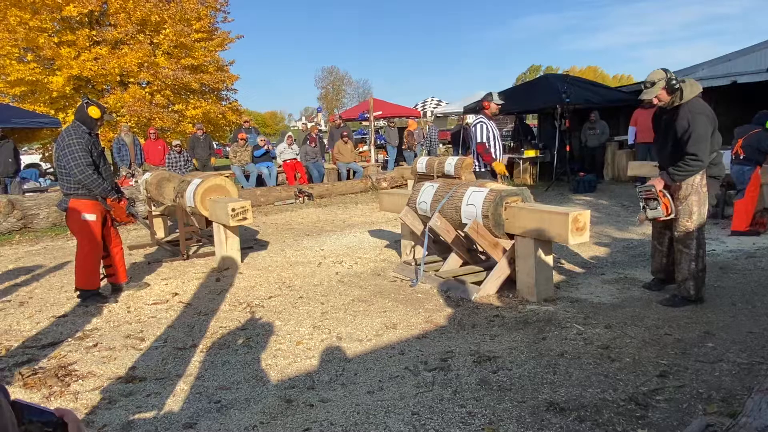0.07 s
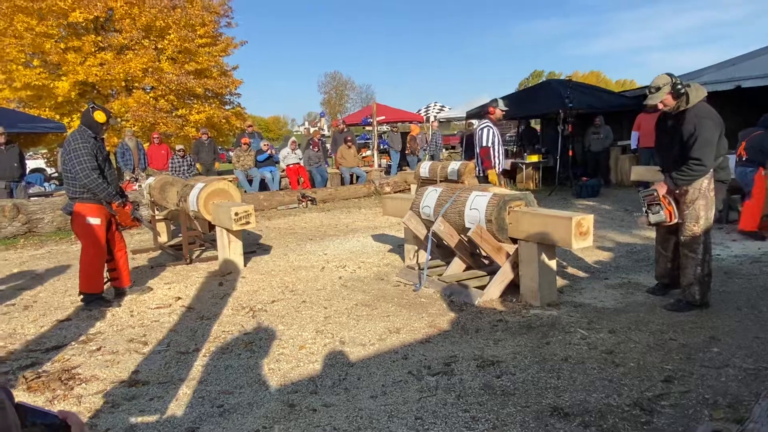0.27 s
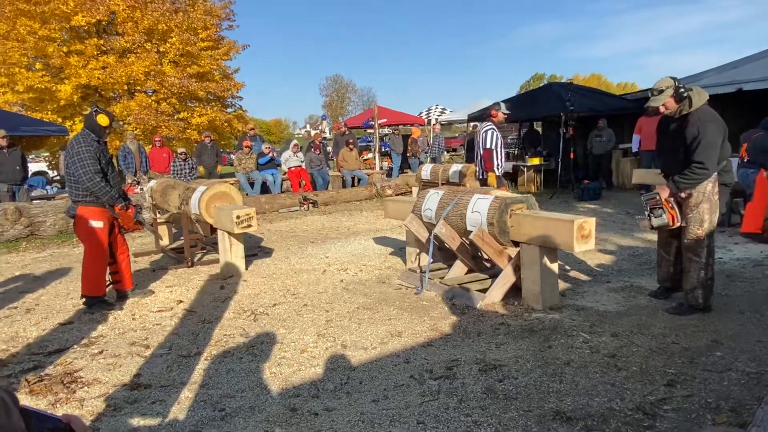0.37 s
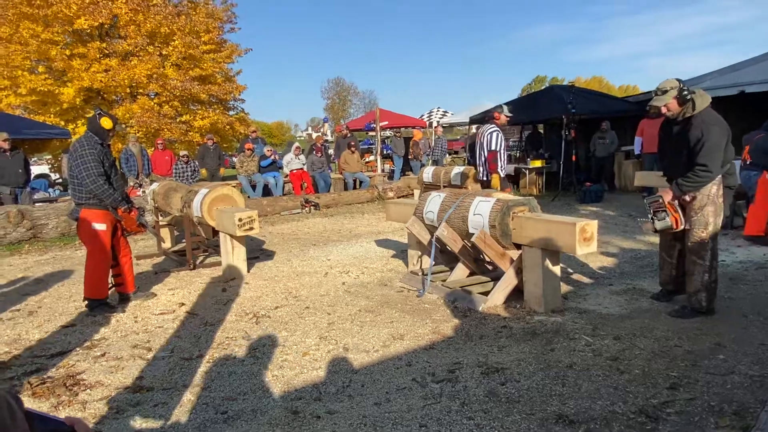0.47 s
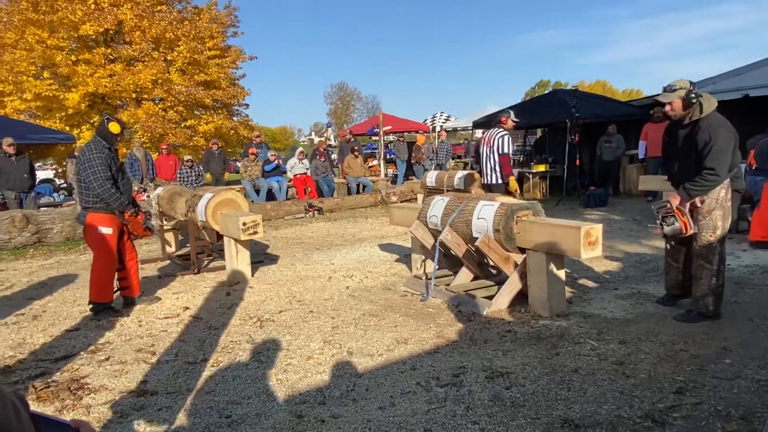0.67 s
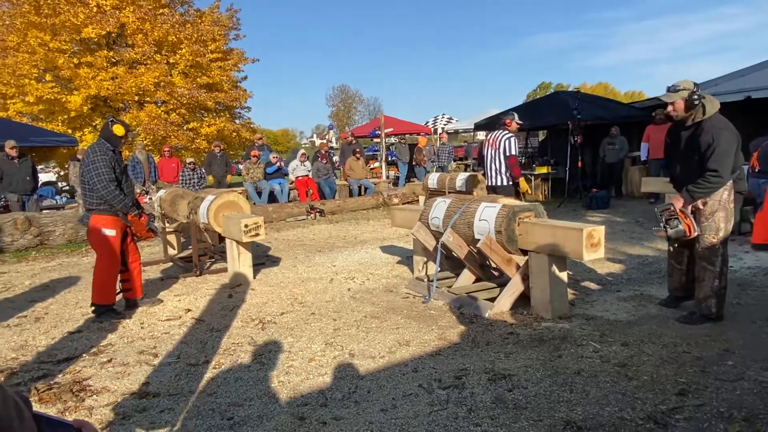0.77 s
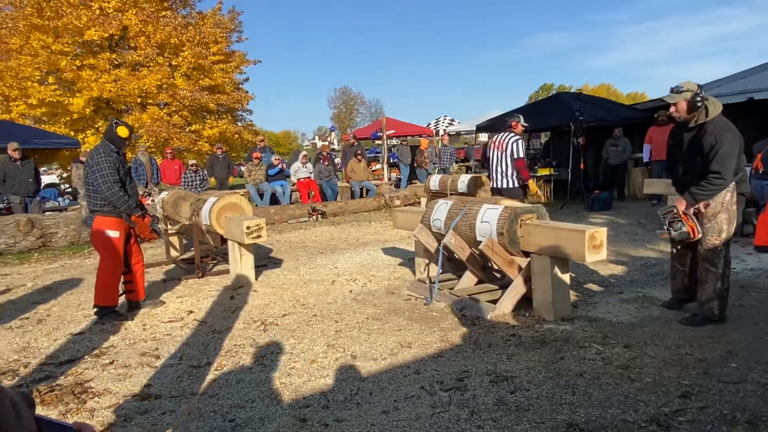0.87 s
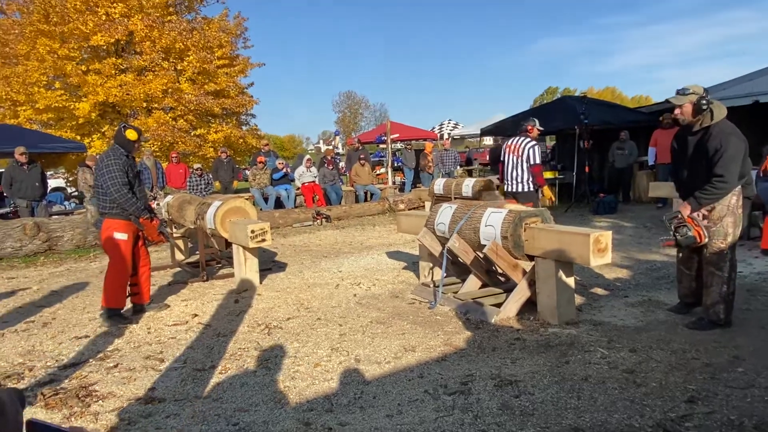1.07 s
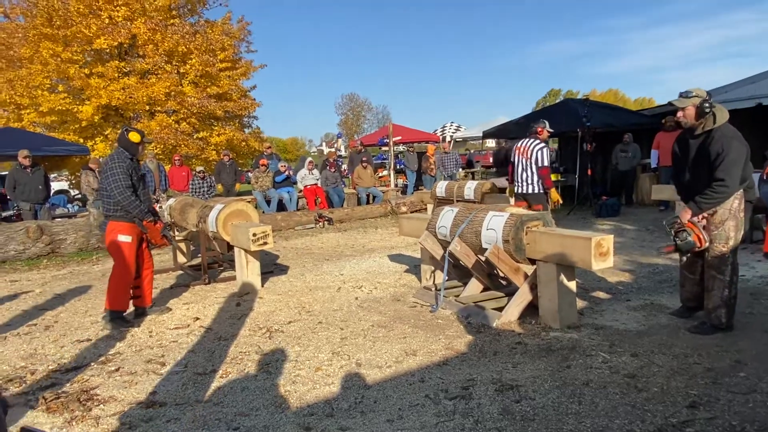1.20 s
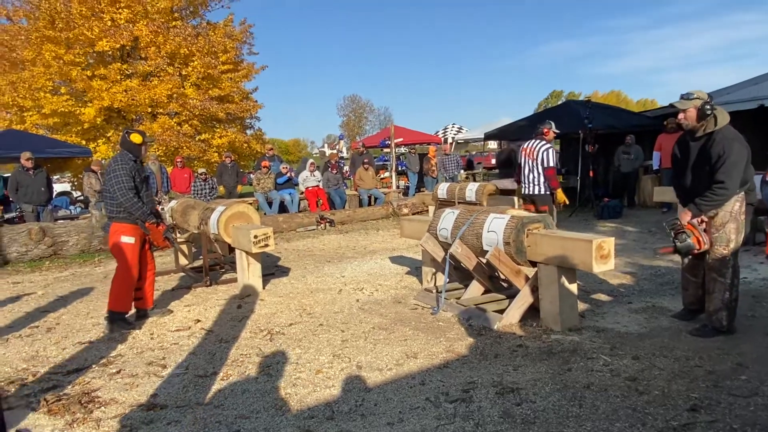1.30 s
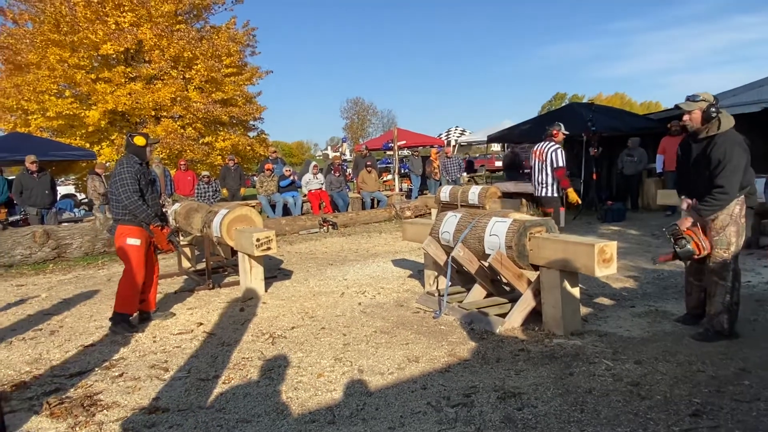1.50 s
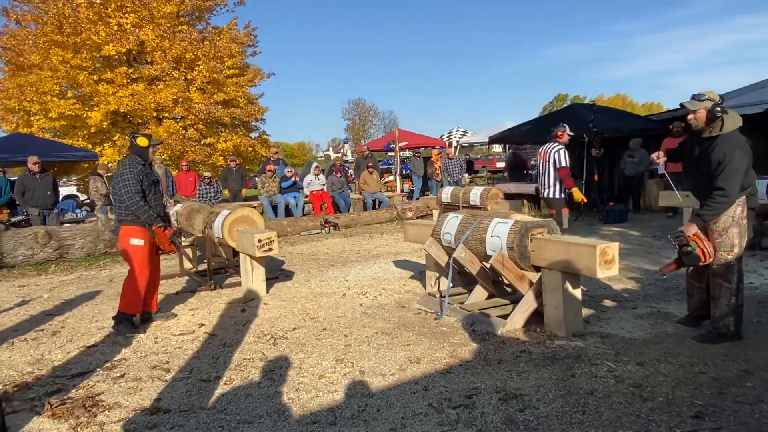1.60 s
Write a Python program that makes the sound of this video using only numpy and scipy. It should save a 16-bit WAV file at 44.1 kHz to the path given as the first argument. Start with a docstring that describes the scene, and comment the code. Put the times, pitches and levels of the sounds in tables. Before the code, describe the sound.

One sharp rev of a two-stroke chainsaw, rising to a scream and falling away.

```python
"""In an open arena, a two-stroke chainsaw is revved flat out, then let go so that it coasts down.
Each turn of the crank pushes an exhaust pulse through the muffler and makes it ring; near top speed
the engine misses every other firing. Single pops sound as it picks up and as it catches again.
Behind it are echoes and a distant din, and air buffets the two openings of a small microphone."""
import sys
import numpy as np
from scipy import signal
from scipy.fft import rfft, irfft, next_fast_len
from scipy.io import wavfile

SR = 44100
rng = np.random.default_rng(int(sys.argv[2]) if len(sys.argv) > 2 else 0)


def file_out(sig):
    """Save sig as 16-bit WAV at sys.argv[1]."""
    # one column per channel
    cols = np.atleast_2d(sig).T
    # limit, then scale
    lim = np.clip(cols, -1, 1)
    pcm = np.round(lim * 32767).astype(np.int16)
    wavfile.write(sys.argv[1], SR, pcm)


N = 72765

# Tone of the distant din and of the wind (frequency [Hz], gain [dB])
DIN_TONE = [(50, -51), (200, -10), (330, -25), (430, -1), (800, -7), (1150, 2), (1400, 3.5), (2600, -2),
            (5000, -58), (7000, -12), (12000, -28.5)]
WIND_TONE = [(20, -22), (45, -16), (72, -3.5), (110, -7), (170, -19), (300, -13), (800, -23)]
# How the wind swells and fades (time [s], level [dB])
WIND_LEVEL = [(0.07, -85), (.3, -70), (.39, -49.5), (.6, -39), (.78, -42.5), (.88, -51), (.94, -52),
              (.98, -50.5), (1.04, -51.5), (1.27, -59), (1.45, -69), (1.65, -52.5)]
# Single firings at low speed (time [s], strength [dB])
POPS = [(.0925, -17), (.129, -11), (1.629, -12), (1.6335, -28), (1.646, -18)]
# How fast the crank spins (time [s], speed [turns per second])
CRANK_SPEED = [(0.07, 62), (.12, 81), (.182, 116), (.218, 139), (.24, 153), (.28, 173), (.34, 190),
               (.4, 200.7), (.5, 213.6), (.6, 222), (.7, 228.3), (.805, 231.6), (.84, 225.5), (.9, 211.3),
               (1, 187.3), (1.1, 169.6), (1.2, 154.9), (1.3, 138.8), (1.5, 114.4), (1.65, 100.5)]
# How evenly the fuel burns (time [s], chance of a miss after a firing [0-1],
# chance of a miss after a miss [0-1], spread in strength [dB], roughness [0-1])
FIRING = [(0.1, 0, 0, 3, .4), (.19, 0, 0, 1.2, .15), (.29, 0, 0, .8, .12), (.32, .3, 0, 1.2, .22),
          (.39, 1, 0, 1, .2), (.56, 1, 0, .8, .15), (.58, 0, 0, .8, .18), (.62, 0, 0, .8, .18),
          (.635, 1, 0, .5, .1), (.71, 1, 0, .5, .1), (.74, 1, .4, .8, .18), (.8, 1, .5, .8, .18),
          (.83, 0, 0, .8, .15), (1.2, 0, 0, 1, .2), (1.65, 0, 0, 1.5, .25)]
# Tone of each part of the saw's sound (frequency [Hz], gain [dB])
POP_TONE = [(80, -38), (200, -13.5), (400, -13.5), (600, -8.5), (750, 1), (900, 8), (1130, -15), (1400, -5),
            (1900, -23), (2600, -2.5), (4300, -12.5), (5400, -36), (6500, -15), (8200, -13.5), (12000, -22)]
THUMP_TONE = [(40, -50), (100, -10.5), (160, -3), (225, 1.5), (290, -6.5), (360, -7.5), (600, -21)]
HOLLOW_TONE = [(280, -38), (370, -25), (420, 6.5), (470, -17.5), (600, -30.5)]
LOW_RING_TONE = [(300, -59), (450, -14), (540, -5), (610, 5.5), (680, 2.5), (750, -0.5), (830, -33.5),
                 (1200, -50)]
HIGH_RING_TONE = [(550, -41.5), (760, 7), (830, -10), (905, 0), (970, 3), (1060, -13.5), (1200, -13),
                  (1800, -59)]
BARK_TONE = [(250, -41.5), (350, -14.5), (430, 2), (530, 12), (700, -3), (1030, -1), (1130, -6), (1300, 5),
             (1420, 2.5), (1550, 6), (1730, -4), (2100, -6.5), (3200, -66)]
SNARL_TONE = [(1000, -62.5), (1600, -0.5), (1850, -3), (2100, 1), (2380, 3), (2750, 7.5), (3050, -3.5),
              (3400, -17), (3750, -3), (4600, -39), (7000, -20)]
RASP_TONE = [(2200, -12), (3000, -13), (3400, 0), (3800, -2.5), (4350, 1.5), (4900, -8), (5450, -26),
             (5750, -13), (6300, -4), (7300, -21), (9000, -28), (12000, -63)]
SIZZLE_TONE = [(5000, -5), (7000, -74.5), (7850, -21), (8080, 0), (9000, -3), (10000, -6), (11400, -13),
               (12600, -26.5), (13200, -56)]
# How the exhaust's parts rise and fall, before each gets its own boost or cut
# (time [s], low ring [dB], high ring [dB], bark [dB], snarl [dB], rasp [dB], sizzle [dB])
EXHAUST_LEVELS = [(.075,-45,-58,-60,-68,-51,-53), (.12,-46,-50.5,-62,-51.5,-48.5,-48.5),
                  (.155,-35.5,-44,-47,-38.5,-36,-43.5), (.19,-18.5,-40,-38.5,-40,-31.5,-35.5),
                  (.265,-19.5,-40,-37,-37,-26,-37), (.3,-20,-26,-35,-34.5,-27.5,-34),
                  (.36,-24.5,-38,-32.5,-29,-32.5,-35.5), (.44,-31.5,-27.5,-30,-31.5,-28.5,-33),
                  (.53,-30,-37.5,-27,-29,-30,-33), (.605,-29,-26.5,-30.5,-32.5,-31.5,-36.5),
                  (.7,-39,-26.5,-32.5,-33.5,-33.5,-38), (.8,-46,-24,-31,-32,-32,-40),
                  (.825,-36,-50,-34.5,-36,-40.5,-45.5), (.9,-39.5,-55,-36.5,-37,-42.5,-49),
                  (.99,-51,-38.5,-43.5,-36,-45.5,-48.5), (1.05,-40,-47.5,-39.5,-35.5,-47.5,-52.5),
                  (1.15,-37.5,-47,-43,-40,-48.5,-53), (1.25,-49.5,-48,-43.5,-42.5,-51,-57),
                  (1.32,-39.5,-62,-50.5,-45,-51.5,-56), (1.47,-48,-47,-55,-48.5,-51,-55),
                  (1.58,-36,-58,-56,-47,-51,-52), (1.62,-56,-46,-43.5,-51,-48,-51.5),
                  (1.635,-36,-39,-44,-60,-57,-53)]
# The bass thump, before its boost (time [s], level [dB])
THUMP_LEVEL = [(0.07, -34.5), (.17, -48.5), (.27, -38.5), (.45, -40.5), (.55, -37.5), (.61, -29),
               (.68, -40), (.79, -44.5), (.86, -77), (1.65, -60.5)]
# The hollow ring (time [s], level [dB])
HOLLOW_LEVEL = [(.07, -39), (.3, -31.5), (.8, -25), (.9, -33), (1.05, -53), (1.3, -43), (1.65, -37.5)]
# Extra head start of the wave at the microphone's left opening (frequency [Hz], phase [radians])
LEFT_LEAD = [(60, 0.3), (130, -0.3), (220, -2.5), (320, -2.5), (450, -4.5), (600, -4), (680, -4), (800, -5),
             (900, -4.5), (1100, -10), (1400, -8.5), (1650, -9), (2050, -7.5), (2700, -4.5), (3300, -5.5),
             (4400, -6), (5000, -10), (6600, -5), (7600, -7), (9000, -11)]
# How much louder the left opening is than the right (frequency [Hz], gain [dB])
LEFT_BALANCE = [(60, 1), (210, -4), (420, 1), (620, -5.5), (880, 3), (1100, -1), (1600, -2), (2300, -1),
                (2900, -1.5), (3400, -3), (4300, -0.5), (7800, 0), (8100, -27.5), (9000, -8.5),
                (10200, -37), (12500, -4)]


def amp(db):
    """Turns decibels into a gain."""
    return 10 ** (np.asarray(db) / 20)


def unit_power(x):
    """Scales a sound to an average power of 1."""
    return x / np.sqrt(np.mean(x ** 2) + 1e-20)


def over_time(table, column=1):
    """Reads one column of a time table at every sample."""
    rows = np.array(table)
    return np.interp(np.arange(N) / SR, rows[:, 0], rows[:, column])


def over_pitch(table, hz):
    """Reads a frequency table, giving every octave equal room."""
    table_hz, value = np.transpose(table)
    return np.interp(np.log(hz + 1), np.log(table_hz), value)


def colour(x, tone, size=4096):
    """Gives a sound a tone, fading it by 20 dB an octave past the ends of the table."""
    hz = abs(np.fft.fftfreq(size, 1 / SR)) + 1
    octaves_out = np.maximum(np.log2(hz / tone[-1][0]), 0) + np.maximum(np.log2(tone[0][0] / hz), 0)
    log_gain = np.log(amp(np.maximum(over_pitch(tone, hz) - 20 * octaves_out, -90)))
    ring = np.fft.ifft(np.exp(np.conj(signal.hilbert(log_gain)))).real  # rings only after each push
    return signal.oaconvolve(np.atleast_2d(x), ring[None, :size // 2], axes=1)[:, :N]


def distant_din(level_db=-44.5):
    """The far-off arena makes a steady wash of noise, different on each side."""
    return amp(level_db) * unit_power(colour(rng.standard_normal((2, N)), DIN_TONE))


def wind():
    """Air buffets the microphone with a low rumble."""
    return unit_power(colour(rng.standard_normal(N), WIND_TONE)) * amp(over_time(WIND_LEVEL))


def add_echoes(x, ground_s=.0032, ground_db=-13.5, echo_db=-11, fade_s=.35, echoes_per_s=1500):
    """Sound bounces off the ground, then comes back thinly from logs, tents and trees."""
    t, time = np.arange(SR // 2) / SR, np.arange(N) / SR
    echoes = rng.standard_normal((2, len(t))) * (rng.random((2, len(t))) < echoes_per_s / SR)
    echoes *= (t > .006) * amp(-60 * t / fade_s)
    centre, width = signal.fftconvolve(x, echoes / np.linalg.norm(echoes[0]), axes=1)[:, :N]
    centre = signal.lfilter(*signal.butter(1, 1100, "high", fs=SR), centre)  # little bass comes back
    width = signal.lfilter(*signal.butter(1, 1190, "high", fs=SR), width)
    ground = np.array([np.interp(time - ground_s, time, side, left=0) for side in x])
    return x + amp(ground_db) * ground + amp(echo_db) * np.array([centre + width, centre - width])


def pops(decay_s=.0082, gas_db=-9):
    """A single firing makes a sharp click and a short rush of gas."""
    t, out = np.arange(N) / SR, np.zeros(N)
    for start_s, strength_db in POPS:
        click = np.arange(N) == round(start_s * SR)
        rush = (t >= start_s) * np.exp(-abs(t - start_s) / decay_s) * rng.standard_normal(N)
        out += 2 * amp(strength_db) * (click + amp(gas_db) * rush)
    return colour(out, POP_TONE)


def casing(pulses, decay_s=.006):
    """The metal casing smears each pulse over a few milliseconds."""
    t = np.arange(600) / SR
    ring = rng.standard_normal(len(t)) * np.exp(-t / decay_s)
    return unit_power(signal.fftconvolve(pulses, ring)[:N])


def engine_strokes(miss_db=-11, jitter_s=.000015):
    """Each turn gives one exhaust pulse, weak if the fuel fails to fire, and then a puff of gas."""
    speed = over_time(CRANK_SPEED)
    turns = np.cumsum(speed) / SR
    turn_ends = np.searchsorted(turns, np.arange(1, int(turns[-1])))
    dice, scatter = rng.random(N), rng.standard_normal((N, 2))
    miss_after_fire, miss_after_miss, spread_db = [over_time(FIRING, k) for k in (1, 2, 3)]
    pulses, strength, missed = np.zeros(N), np.ones(N), False
    nearby = np.arange(-16, 17)
    for k, i in enumerate(turn_ends):
        missed = dice[k] < (miss_after_miss if missed else miss_after_fire)[i]
        lift_db = -miss_db * miss_after_fire[i] / 3  # all pulses grow where misses are likely
        strength[i:] = amp(miss_db * missed + lift_db + spread_db[i] * scatter[k, 0])
        late_s = (turns[i] - k - 1) / speed[i]
        offset = (jitter_s * scatter[k, 1] - late_s) * SR
        click = np.sinc(nearby - offset) * np.hanning(len(nearby))  # can land between samples
        pulses[np.clip(i + nearby, 0, N - 1)] += strength[i] * click
    puffs = 1 + strength * np.exp(-(turns % 1))  # a steady flow plus a puff that fades over the turn
    return unit_power(pulses / np.sqrt(speed)), unit_power(puffs)


def chainsaw(low_ring_gas=.45, snarl_gas=.2, rasp_gas=.42, sizzle_gas=.71):
    """Pulses and rushing gas make the muffler ring, bark and snarl, the metal rasp and the jet sizzle."""
    pulses, puffs = engine_strokes()
    roughness = over_time(FIRING, column=4)
    low_db, high_db, bark_db, snarl_db, rasp_db, sizzle_db = [
        over_time(EXHAUST_LEVELS, k) for k in range(1, 7)]

    def voice(tone, gas_share, level_db, drive=pulses):
        """One part of the sound: the more gas noise in it, the rougher it is."""
        hiss = rng.standard_normal(N) + rng.standard_normal((2, N))  # half shared by left and right
        gas = puffs * unit_power(hiss)
        blend = (1 - gas_share) * drive + gas_share * gas
        return unit_power(colour(blend, tone)) * amp(level_db)

    thump = voice(THUMP_TONE, roughness, over_time(THUMP_LEVEL) + 1.5)
    low_ring = voice(LOW_RING_TONE, low_ring_gas * roughness, low_db + 6)
    high_ring = voice(HIGH_RING_TONE, roughness, high_db + 7.5)
    bark = voice(BARK_TONE, roughness, bark_db + 7)
    snarl = voice(SNARL_TONE, snarl_gas, snarl_db + 3, drive=unit_power(pulses + casing(pulses)))
    rasp = voice(RASP_TONE, rasp_gas, rasp_db - .5, drive=casing(pulses))
    hollow_ring = voice(HOLLOW_TONE, roughness, over_time(HOLLOW_LEVEL))
    sizzle = voice(SIZZLE_TONE, sizzle_gas, sizzle_db + 3.5)
    return thump + low_ring + high_ring + bark + snarl + rasp + hollow_ring + sizzle


def scene():
    """Din and wind lie behind the saw, its pops and their echoes."""
    return distant_din() + wind() + add_echoes(chainsaw() + pops())


def record(dry, left_early_s=.000454, start_s=.072, top_hz=12900):
    """The microphone's two openings differ in timing and level; the sound cuts in and loses its top."""
    size = next_fast_len(2 * N)
    hz = np.fft.rfftfreq(size, 1 / SR)
    lead = 2 * np.pi * hz * left_early_s + over_pitch(LEFT_LEAD, hz)
    balance = amp(over_pitch(LEFT_BALANCE, hz))
    openings = np.array([balance * np.exp(1j * lead), np.ones(len(hz))])
    openings *= np.sqrt(2 / (1 + balance ** 2))  # keeps the total power the same
    heard = irfft(rfft(dry, size) * openings, size)[:, :N]
    heard *= np.arange(N) / SR >= start_s
    treble_cut = signal.firwin(255, top_hz, window=("kaiser", 8), fs=SR)
    return signal.oaconvolve(heard, treble_cut[None], "same")


dry = scene()
out = record(dry)
file_out(out)
```